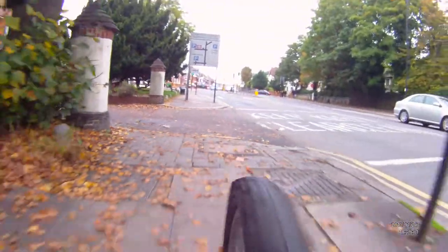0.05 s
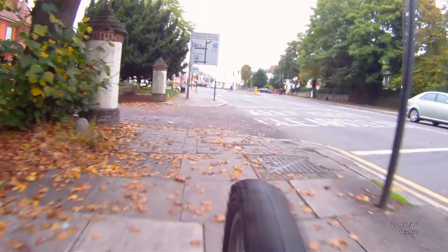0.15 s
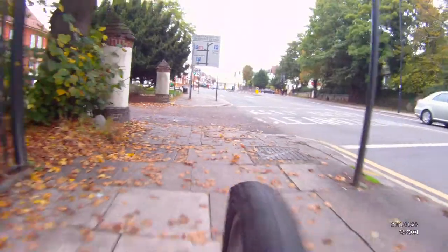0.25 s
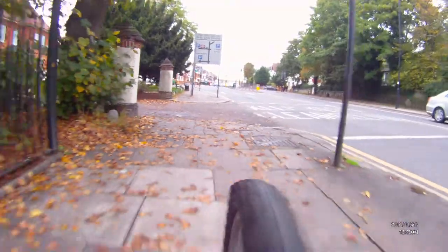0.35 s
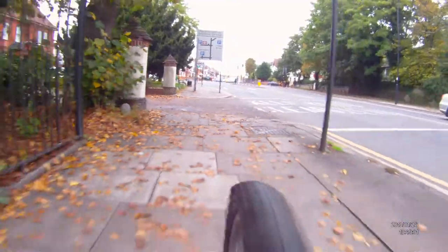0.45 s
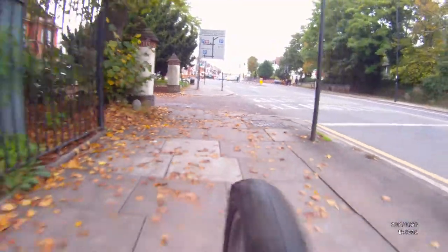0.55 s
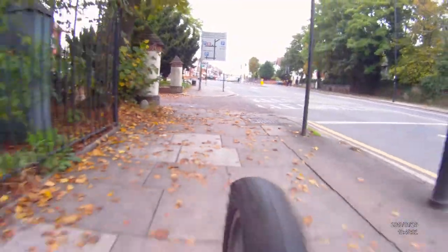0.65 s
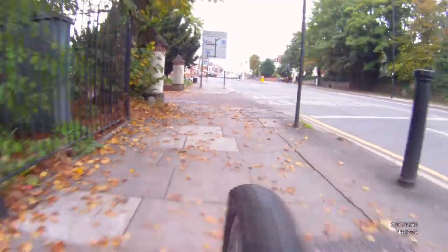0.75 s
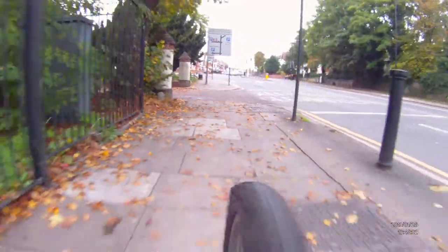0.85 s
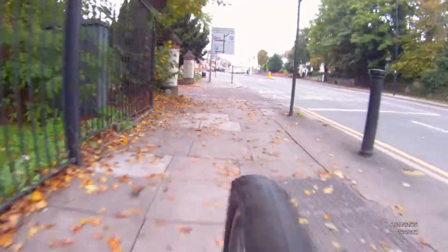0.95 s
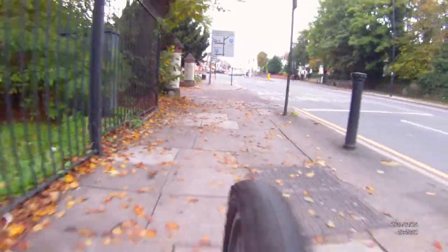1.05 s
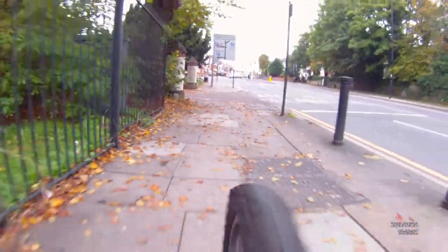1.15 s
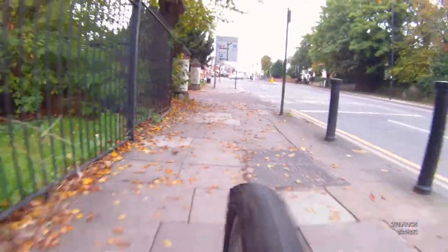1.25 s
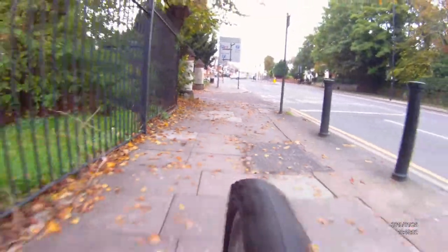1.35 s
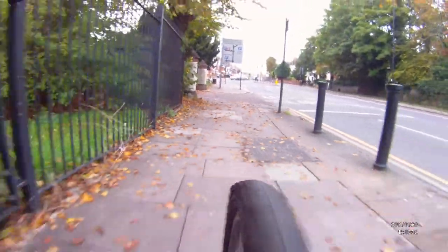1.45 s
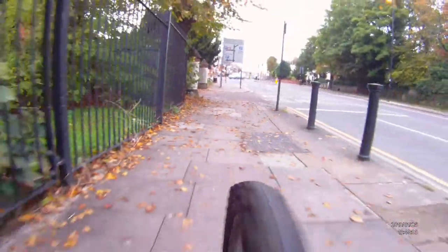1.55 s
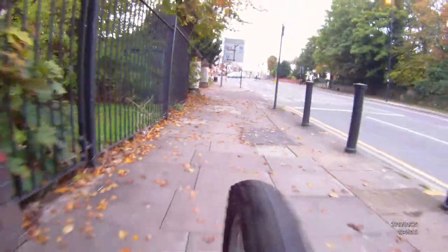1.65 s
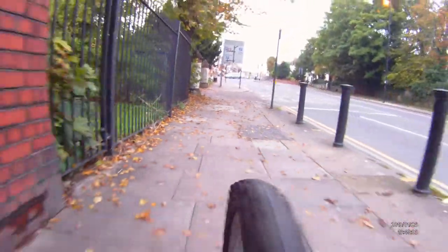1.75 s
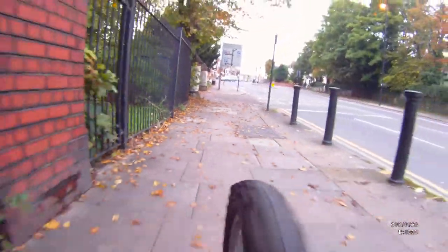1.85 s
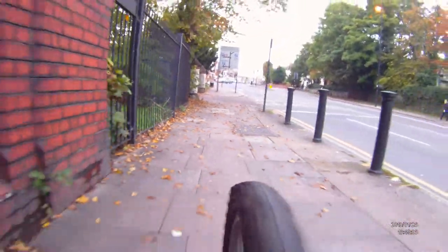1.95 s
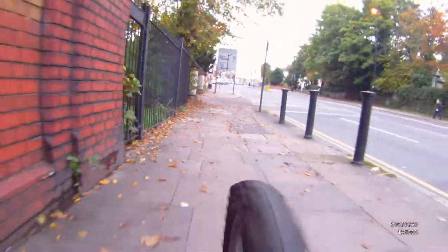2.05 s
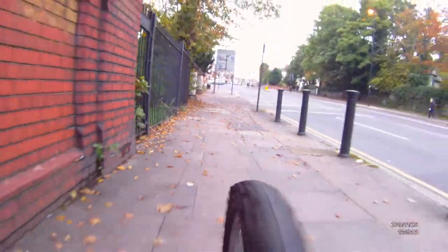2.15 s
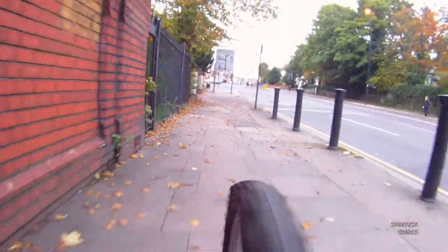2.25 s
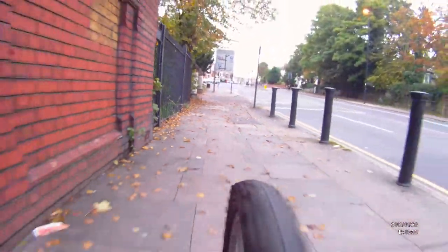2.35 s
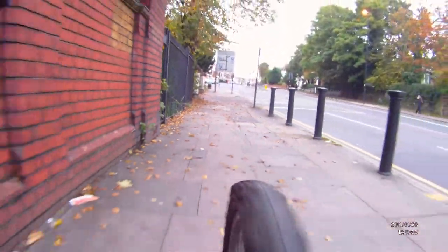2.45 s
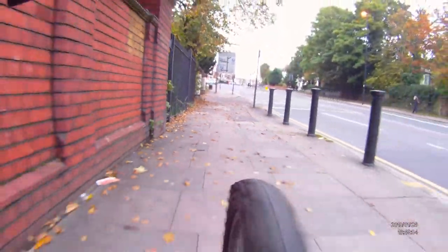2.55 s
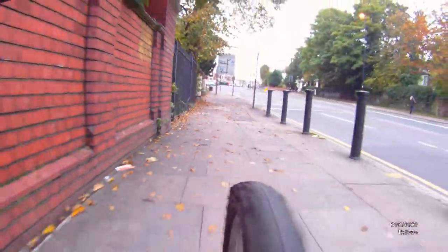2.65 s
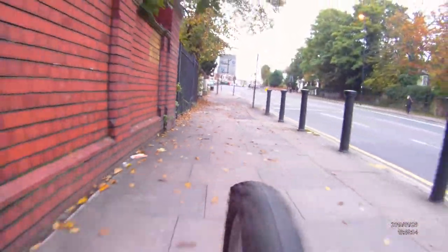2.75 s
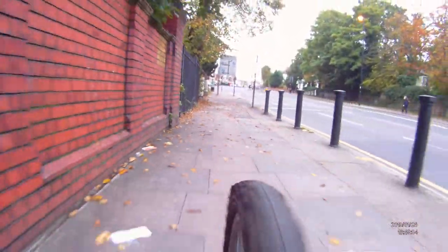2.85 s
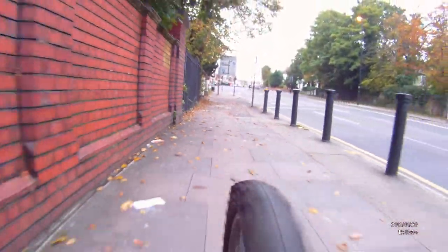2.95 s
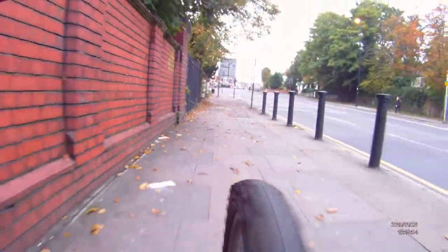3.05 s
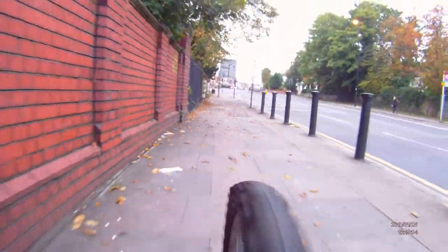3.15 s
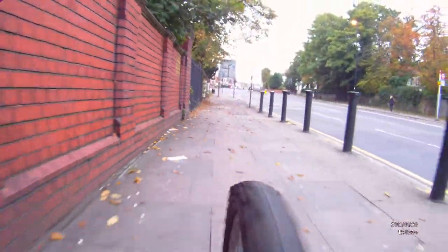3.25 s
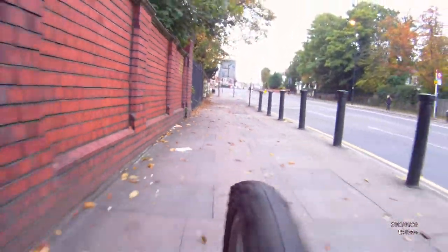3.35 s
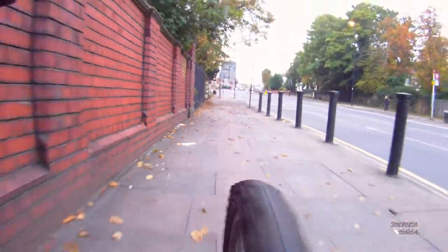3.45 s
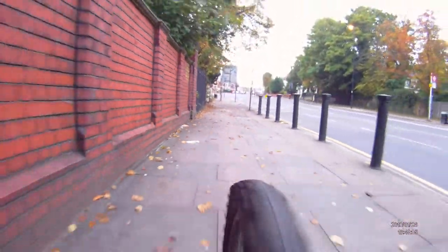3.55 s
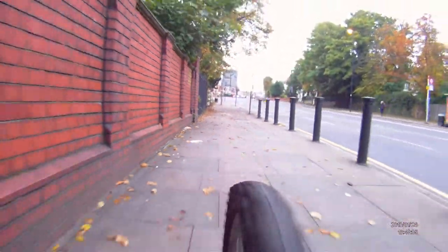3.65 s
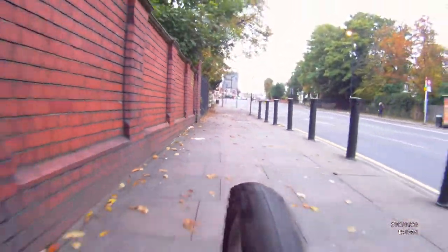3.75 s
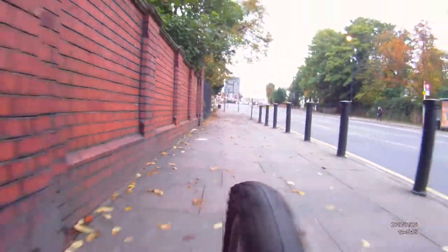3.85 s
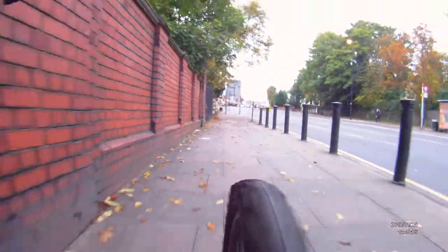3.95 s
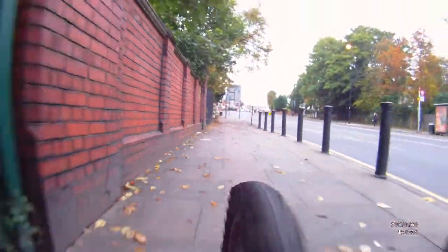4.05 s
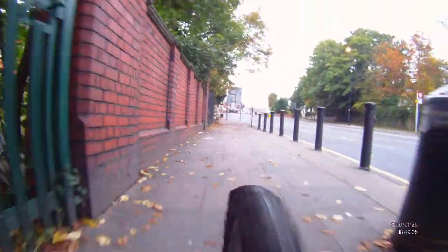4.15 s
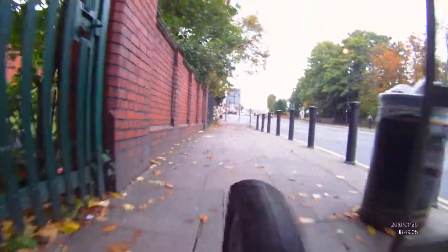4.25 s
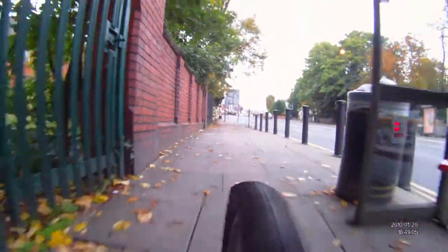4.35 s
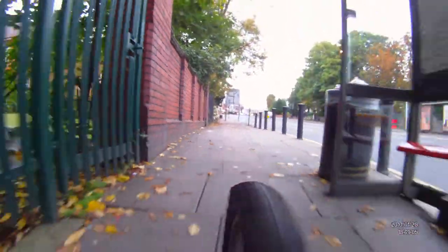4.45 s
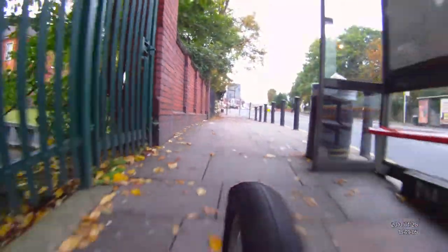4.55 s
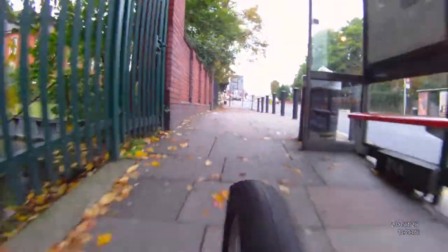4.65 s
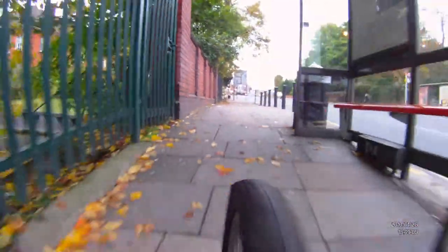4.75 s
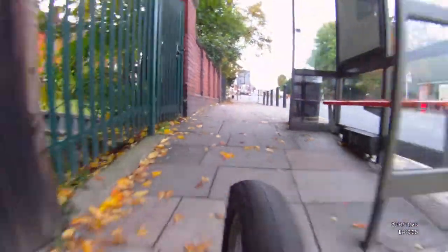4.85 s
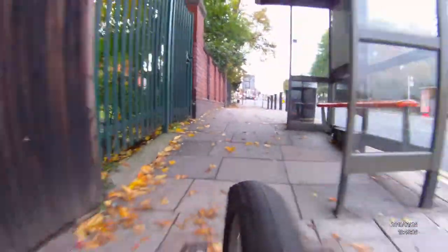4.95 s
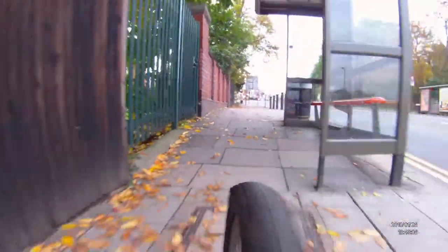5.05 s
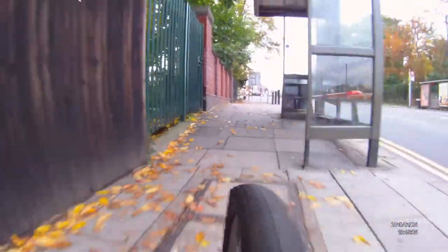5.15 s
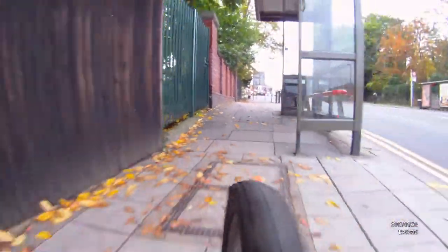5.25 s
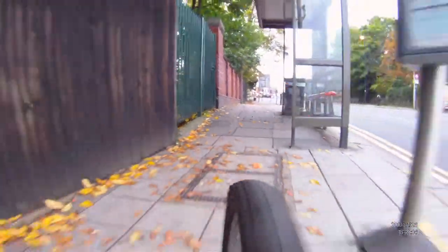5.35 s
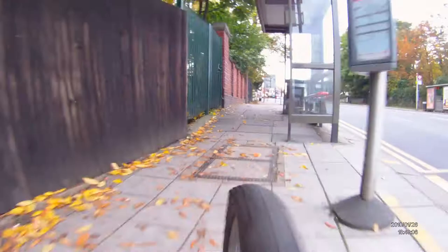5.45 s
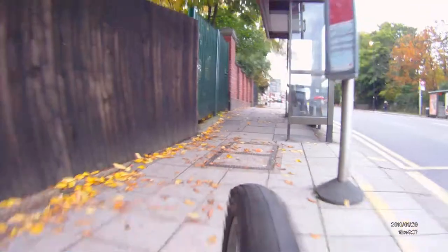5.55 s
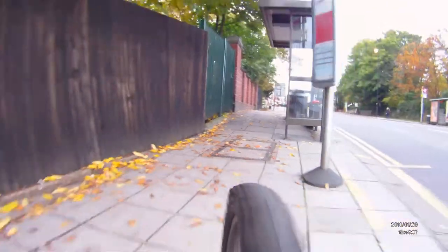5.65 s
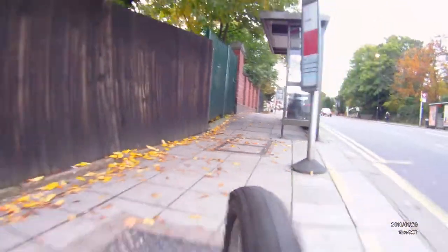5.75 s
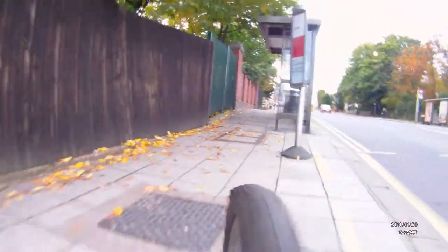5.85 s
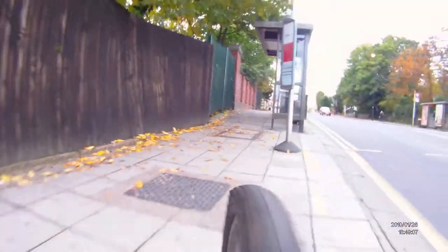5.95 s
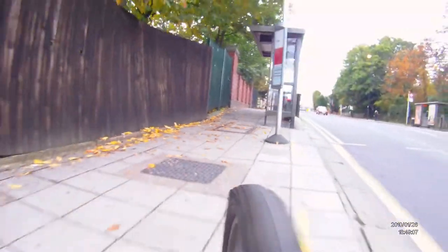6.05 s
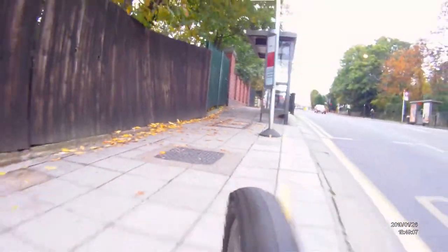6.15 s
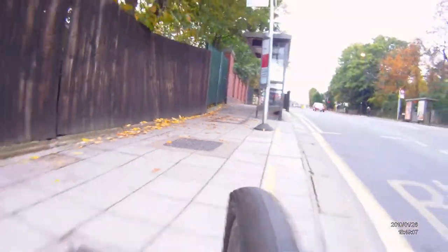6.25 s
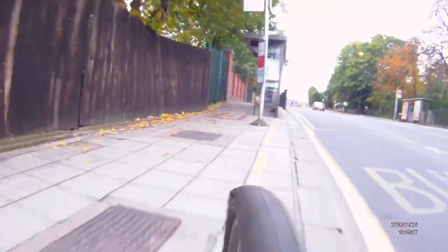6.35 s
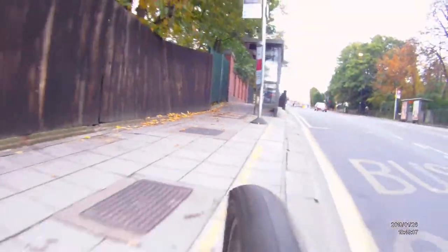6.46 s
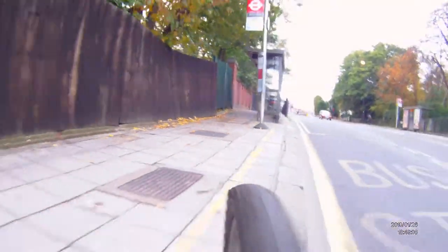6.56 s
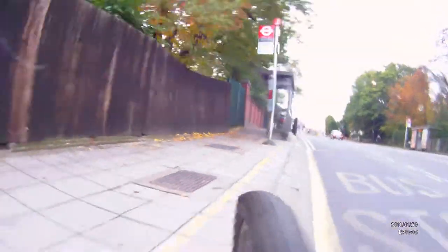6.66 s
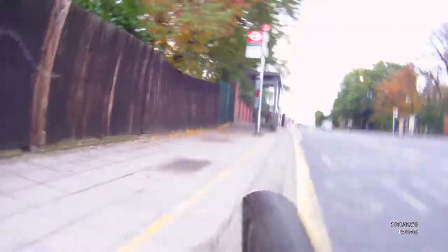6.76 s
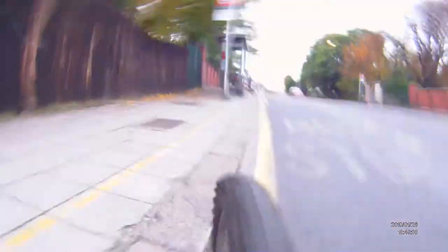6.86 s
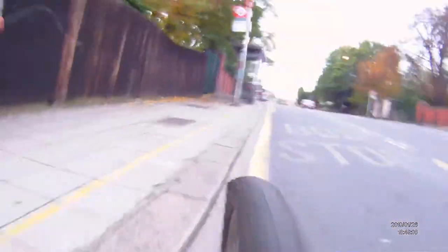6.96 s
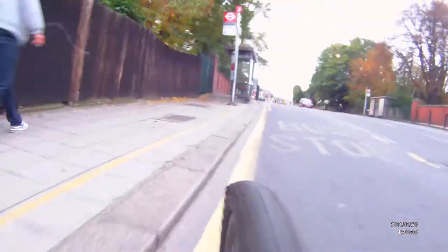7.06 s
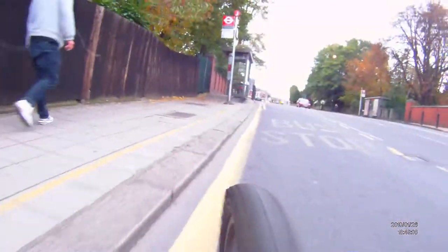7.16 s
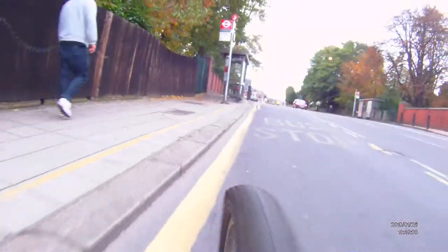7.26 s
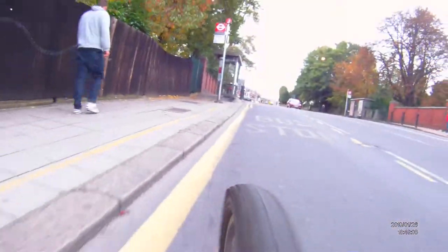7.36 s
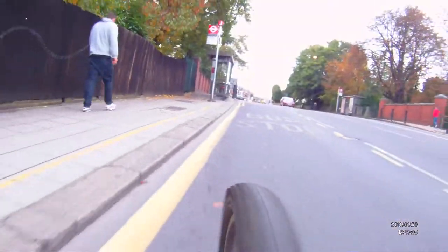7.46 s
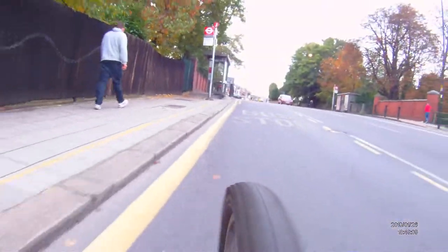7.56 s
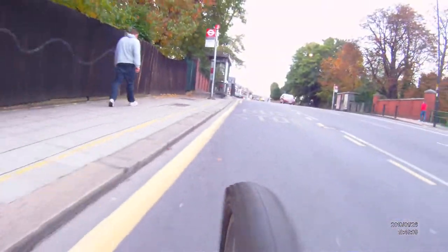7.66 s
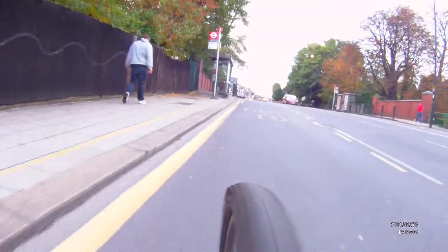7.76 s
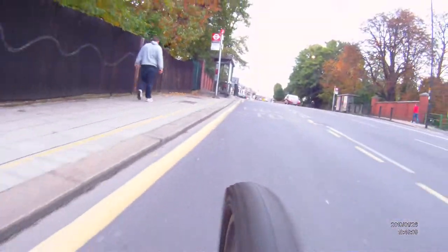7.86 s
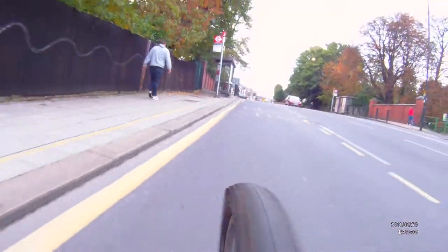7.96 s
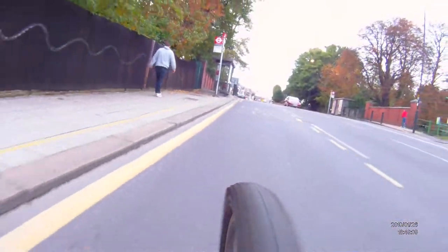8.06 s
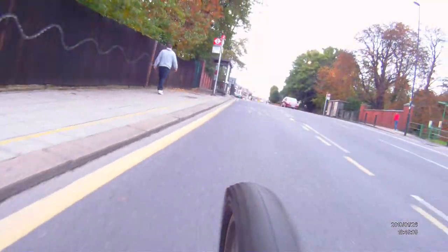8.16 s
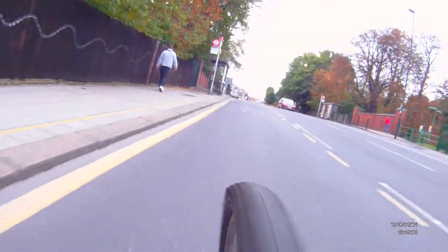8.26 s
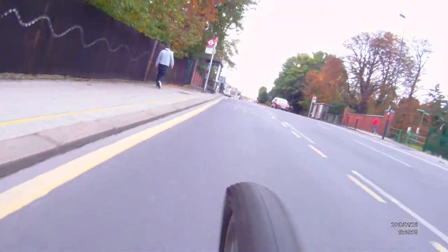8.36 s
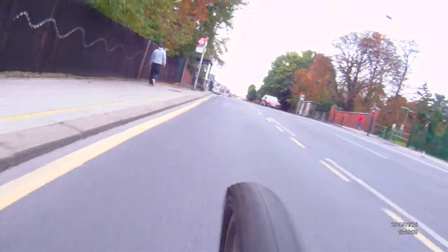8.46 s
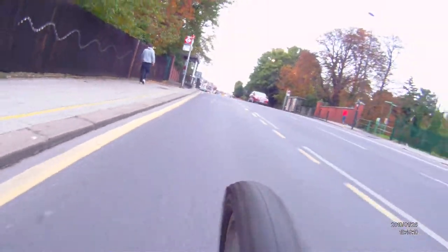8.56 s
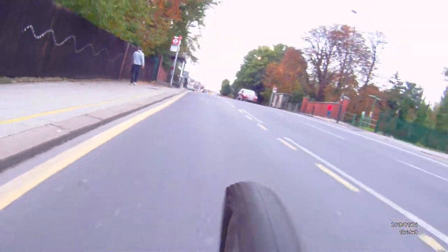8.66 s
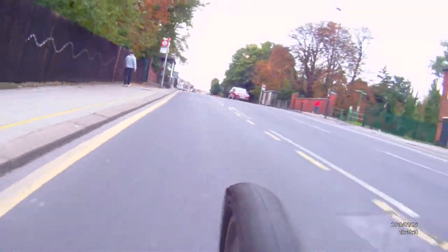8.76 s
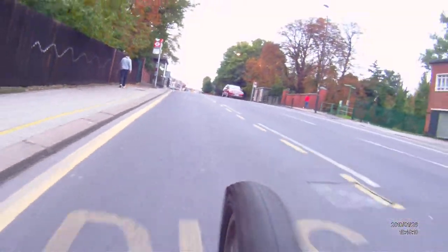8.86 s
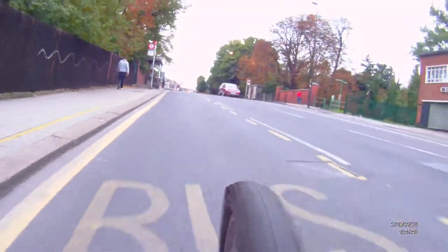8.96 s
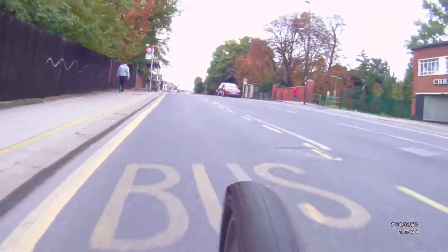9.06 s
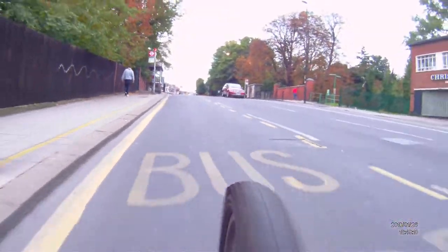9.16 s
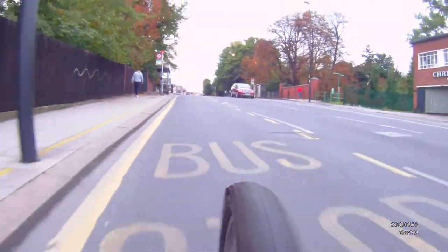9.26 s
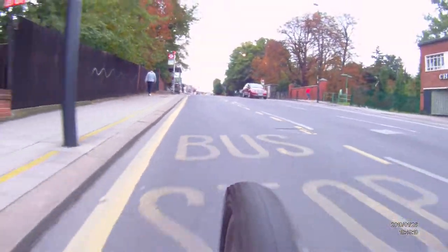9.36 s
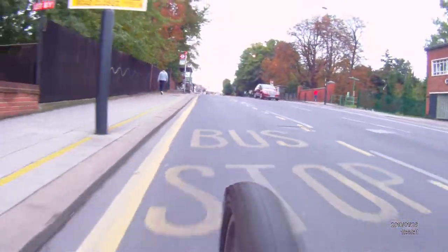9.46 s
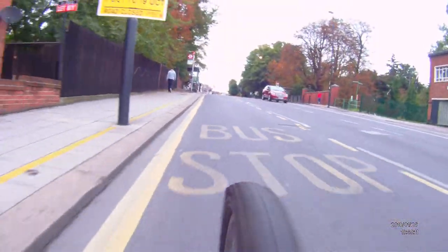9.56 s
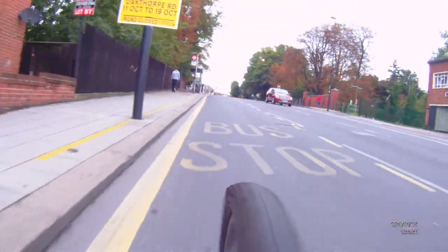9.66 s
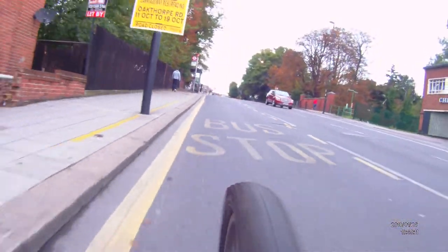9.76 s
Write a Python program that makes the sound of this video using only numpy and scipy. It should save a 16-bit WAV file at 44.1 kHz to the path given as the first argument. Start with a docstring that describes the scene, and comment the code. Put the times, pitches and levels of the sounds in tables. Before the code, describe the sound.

Close, boxy rattling and quick irregular ticks come from a bicycle riding over a pavement, with the microphone in a housing fixed to it. Brief squeaks and scattered knocks sit over a continuous tyre hum and rumble. The knocking thickens past the middle and peaks in a hard, overloaded clatter at the kerb. Then the ride turns smoother on the road, the hum slightly higher, with light rattling and several tiny pings.

```python
"""Camera housing on a moving bicycle

A closed housing rides on a bicycle frame over paving slabs, drops off a kerb and rolls on asphalt.
The tyre drones below while frame vibration drives the housing's resonances. The mount squeaks by
stick-slip friction and a loose part ticks against the wall. Slab joints and the kerb cause knocks
and thuds; short, clean pings follow on the asphalt. The hardest jolts overload the input."""
import sys
import numpy as np
from scipy import signal
from scipy.io import wavfile

SR = 44100
rng = np.random.default_rng(int(sys.argv[2]) if len(sys.argv) > 2 else 0)


def bounce(signal):
    """Save signal as a 16-bit WAV file at the path given by the first command-line argument."""
    frames = np.transpose(np.atleast_2d(signal))
    limited = np.clip(frames, -1, 1)
    pcm = np.round(limited * 32767).astype(np.int16)
    wavfile.write(sys.argv[1], SR, pcm)


N = 432621

# Tyre tones: time_s, upper_hz, upper_db, low_db, clear_share (0-1, of the upper tone's power)
TYRE_CURVE = [(0, 239.1, -30.5, -60, 0.56), (.7, 232.6, -37, -50, 0.35), (1.3, 237.3, -31, -48.5, 0.84),
              (2.4, 229.2, -31.5, -47.5, 0.94), (4.2, 225.5, -36.5, -50, 0.67),
              (4.8, 238, -30.5, -41.5, 0.18), (5.3, 240.2, -33, -46, 0.58), (6.25, 239.6, -30, -34.5, 0),
              (7.3, 252.4, -31, -40, 0.6), (7.8, 263.7, -24.5, -38, 0.84), (8.5, 268.4, -29, -43.5, 0),
              (9.81, 272, -30.5, -42.5, 0.51)]
# Spectrum of the road rumble: centre_hz, relative_density_db
RUMBLE_BANDS = [(25, -15), (60, -11), (130, -1), (190, 2), (260, 9), (310, -5.5), (450, -6.5), (800, -7)]
# Frame vibration reaching the housing: time_s, level_db
SHAKE_CURVE = [(0, -29.5), (.5, -28), (1.05, -30), (3.1, -31), (4.2, -28.5), (4.65, -26.5), (4.92, -25.5),
               (5.1, -30), (5.9, -22), (6.06, -26), (6.58, -25), (6.66, -22.5), (6.9, -16.5), (6.96, -6.5),
               (7.2, -14.5), (7.33, -24), (8.03, -25), (8.6, -24), (9.81, -25)]
# Resonances of the housing: pitch_hz, bandwidth_hz, gain_db
HOUSING_MODES = [(516, 310, -12.5), (962, 39.4, 0), (1134, 135, -5), (1396, 106, 9), (1732, 510, -1),
                 (2185, 364, -5), (2494, 205, -8.5)]
# Its faint high resonances: pitch_hz, bandwidth_hz, gain_db
BUZZ_MODES = [(3390, 170, -20), (5010, 540, -21.5), (5670, 110, -21.5)]
# Squeaks of the mount: centre_s, pitch_hz, level_db, length_s
MOUNT_SQUEAKS = [(0.265, 1850, -18, 0.018), (0.385, 1887, -23, 0.046), (0.49, 2480, -19, 0.02),
                 (0.514, 1840, -14, 0.032), (0.621, 1874, -19, 0.041), (0.73, 1707, -24.5, 0.031),
                 (0.777, 2440, -27, 0.044), (0.912, 1870, -23.5, 0.075), (1.335, 1790, -24, 0.02),
                 (1.456, 1593, -18.5, 0.016), (3.942, 1775, -19, 0.01), (4.065, 1613, -17, 0.025),
                 (4.694, 1650, -22, 0.018), (4.908, 1810, -18, 0.014), (4.933, 1470, -13.5, 0.023),
                 (4.978, 1910, -17, 0.027), (5.121, 1765, -22, 0.01), (5.298, 1760, -15, 0.011),
                 (5.479, 2530, -17.5, 0.025), (5.677, 1840, -21.5, 0.036), (6.093, 2020, -18, 0.0098),
                 (6.119, 2380, -12, 0.017), (6.157, 1812, -11, .02), (6.27, 2360, -20, 0.028),
                 (6.502, 2394, -15.5, 0.015), (6.653, 2510, -21, 0.041), (6.674, 1990, -16.5, 0.064),
                 (7.25, 1800, -17, 0.04)]
# Hollow thuds of the frame: start_s, peak_db, pitch_hz
FRAME_THUDS = [(4.924, -7, 406), (6.302, -11, 400), (6.73, 0, 333)]
# Pings near the housing's main resonance: peak_s, peak_db, pitch_hz
HOUSING_PINGS = [(7.2987, -2, 1560), (7.307, -6, 1500), (7.351, -10, 1572), (7.404, -8, 1486),
                 (8.45, -5, 1368), (8.5, -5, 1380), (8.6, -6.5, 1500), (8.662, 1.5, 1390),
                 (8.939, -5, 1420)]
# Loud strikes of the loose part: start_s, strength_db
LOUD_STRIKES = [(0.3685, -14.5), (0.637, -11), (0.8906, -11.5), (0.9113, -13), (1.193, -16), (1.2735, -20),
                (1.295, -16), (1.9036, -13), (2.026, -20.5), (2.142, -21.5), (2.495, -22.5), (2.9978, -22),
                (3.2365, -19), (3.297, -19), (3.4191, -22.5), (3.8488, -15.5), (3.8666, -14), (3.949, -17),
                (4.004, -20), (4.17, -15), (4.2114, -13.5), (4.272, -16), (4.492, -6.5), (4.553, -11),
                (4.6343, -16), (4.742, -12.5), (4.812, -17), (4.8529, -13.5), (4.974, -13.5), (5.057, -20),
                (5.54, -11), (5.56, -16), (5.6858, -8.5), (5.729, -0.5), (5.8296, -1), (5.894, -10.5),
                (5.9176, -7.5), (5.957, -9), (5.9986, -7), (6.2837, -13.5), (6.355, -11), (6.3759, -9),
                (6.3984, -8), (6.518, -10.5), (6.539, -8.5), (6.6482, -11.5), (6.687, -10.5), (6.83, -10),
                (6.869, -8), (7.096, -1), (7.9008, -20), (8.1, -19.5), (8.243, -23), (8.579, -16.5),
                (8.8058, -21), (8.8664, -15.5), (9.1465, -15), (9.603, -17)]
# Its light touches: time_s, strength_db
TOUCH_CURVE = [(0, -29.5), (.33, -42), (.4, -26.5), (.8, -31.5), (1.3, -28.5), (2.3, -35), (2.65, -29),
               (3.8, -27.5), (5.95, -24), (6.1, -31.5), (6.9, -19), (7.26, -38), (7.76, -32), (7.82, -27.5),
               (8.35, -27.5), (8.93, -20.5), (8.97, -34), (9.06, -39), (9.1, -25.5), (9.81, -29)]
# Resonances that it excites: pitch_hz, bandwidth_hz, gain_db
STRIKE_MODES = [(1356, 477, 5.5), (2418, 585, 6), (4586, 520, 3.5), (5750, 1260, -8), (7780, 900, -15)]
# Jolts from the road: start_s, level_db, pitch_hz, push_s
JOLTS = [(1.092, -2.5, 1560, 0.0047), (2.9114, -4, 1560, 0.0042), (4.241, -8, 1380, 0.0068),
         (4.258, -12.5, 1660, 0.0039), (4.412, -3, 1550, 0.0029), (4.56, -2.5, 2110, 0.0042),
         (5.702, -3, 1390, 0.0071), (5.756, -8.5, 1350, 0.0062), (5.797, -14, 1410, 0.0041),
         (5.845, -19, 1310, 0.0043), (5.966, -12, 970, 0.0062), (6.001, -17, 1380, 0.005),
         (6.305, -16, 1410, 0.0069), (6.714, -11, 1860, 0.0053), (6.729, -1, 1285, 0.014),
         (6.751, -1.5, 1430, 0.0031), (6.776, -4.5, 1400, 0.0037), (6.798, -14.5, 1020, 0.0028),
         (6.853, -7, 1375, 0.0022), (6.877, -9, 1400, 0.0026), (6.895, -3.5, 1460, 0.0016),
         (6.94, -2, 1413, 0.03), (6.975, -0.5, 1335, 0.019), (7.003, -2, 1485, 0.021),
         (7.03, -2, 1317, 0.045), (7.108, -2.5, 1374, 0.041), (7.176, -3, 1480, 0.012),
         (7.213, -5, 1294, 0.0063), (7.255, -6.5, 1460, 0.003), (9.07, -5, 1440, 0.0032)]
# Resonances that a jolt excites besides the housing's: pitch_hz, bandwidth_hz, gain_db
JOLT_MODES = [(944.7, 74, 4.5), (1790, 200, -10.5), (665, 480, -5.5), (2045, 330, 10)]


def amp(db):
    """Amplitude ratio of a level in decibels."""
    return 10 ** (np.asarray(db) / 20)


def unit_rms(x):
    """Normalisation to a root mean square of 1."""
    return x / np.sqrt(np.mean(x ** 2) + 1e-20)


def curves(rows):
    """Linear interpolation of each column over time, sample by sample."""
    times, *columns = np.transpose(rows)
    return [np.interp(np.arange(N) / SR, times, column) for column in columns]


def drift(rate_hz):
    """Random fluctuation: low-passed noise of rms 1."""
    pole = np.exp(-2 * np.pi * rate_hz / SR)
    return unit_rms(signal.lfilter([1], [1, -2 * pole, pole * pole], rng.standard_normal(N + SR))[SR:])


def resonate(x, hz, width_hz):
    """Response of a damped oscillator with unit gain at resonance."""
    radius = np.exp(-np.pi * width_hz / SR)
    feedback = [1, -2 * radius * np.cos(2 * np.pi * hz / SR), radius ** 2]
    return signal.lfilter(np.array([1, 0, -1]) * (1 - radius ** 2) / 2, feedback, x)


def modal_sum(x, modes):
    """Superposition of modes with alternating signs."""
    return sum((-1) ** k * amp(db) * resonate(x, hz, width) for k, (hz, width, db) in enumerate(modes))


def wall(x, cutoff_hz=3200):
    """Transmission loss: the housing wall passes little above the cutoff."""
    return signal.sosfilt(signal.butter(2, cutoff_hz, fs=SR, output="sos"), x)


def wavering_tone(hz, spread_hz, steady=0):
    """Random modulation spreads a tone into a narrow band around an optional steady carrier."""
    phase = 2 * np.pi * np.cumsum(hz) / SR
    return unit_rms((steady + drift(spread_hz)) * np.cos(phase) + drift(spread_hz) * np.sin(phase))


def electronics():
    """The electronic noise floor: broadband hiss and a thin, wavering whine."""
    whine_hz = 7850 + 25.3 * drift(50.5)
    hiss = unit_rms(resonate(rng.standard_normal(N), 8000, 14000))
    whine = amp(-58 + 0.76 * drift(40)) * np.sin(2 * np.pi * np.cumsum(whine_hz) / SR)
    return amp(-67) * hiss + whine


def road_rumble():
    """Random excitation by the road: adjoining bands of low noise."""
    hz, band_db = np.transpose(RUMBLE_BANDS)
    edges = np.r_[hz[0] * .7, np.sqrt(hz[1:] * hz[:-1]), hz[-1] * 1.4]
    rumble = np.zeros(N)
    for low_hz, high_hz, db in zip(edges, edges[1:], band_db):
        band = signal.butter(2, [low_hz, high_hz], "band", fs=SR, output="sos")
        rumble += amp(db) * signal.sosfilt(band, rng.standard_normal(N))
    return unit_rms(rumble)


def tyre_drone():
    """Rolling noise: three tones in constant ratio rise together with speed, over road rumble."""
    upper_hz, upper_db, low_db, clear = curves(TYRE_CURVE)
    line = wavering_tone(upper_hz, spread_hz=4, steady=2.5)
    skirt = wavering_tone(.93 * upper_hz, spread_hz=24.7)
    upper = np.sqrt(clear) * line + np.sqrt(1 - clear) * skirt
    middle = wavering_tone(4 / 5 * upper_hz, spread_hz=2.5)
    low = wavering_tone(2 / 5 * upper_hz, spread_hz=6, steady=1.2)
    tones = amp(upper_db) * upper + amp(upper_db - 12.5) * middle + amp(low_db) * low
    rumble_db = -36.5 + 0.6 * (upper_db + 36.5) - 3.5 * clear   # sinks when the upper tone is clear
    return tones + road_rumble() * amp(rumble_db + 2 * drift(13))


def housing_vibration(shake_db):
    """Forced vibration: lumpy road noise drives the housing's modes; the high buzz comes in patches."""
    lumps = amp(np.minimum(2.9 * drift(27) + 3.1 * drift(135), 5))
    body = wall(modal_sum(lumps * rng.standard_normal(N), HOUSING_MODES))
    patches = np.sqrt(lumps) * amp(3.3 * drift(30))
    buzz = modal_sum(patches * rng.standard_normal(N), BUZZ_MODES)
    return amp(shake_db) * unit_rms(body + buzz)


def mount_squeaks(shake_db):
    """Stick-slip friction: brief swelling tones slide a little in pitch, wrapped in scratch."""
    t, out = np.arange(N) / SR, np.zeros(N)
    slide = 1 + 0.0292 * drift(90)
    roughness = amp(np.clip(2 * drift(150), -6, 3))
    grit = rng.standard_normal(N)
    scratch = amp(-3) * unit_rms(resonate(resonate(grit, 1830, 600), 1830, 600))
    # Faint squeaks fall at random up to the kerb, weaker where the ride is smooth.
    kerb_s, faint_length_s = 6.7, 0.017
    when, pitch, softness = rng.random((70, 3)).T
    faint_s = .1 + (kerb_s - .1) * when
    rubbing_db = np.minimum(2 * shake_db[(faint_s * SR).astype(int)] + 28, -21)
    faint = zip(faint_s, 1700 + 660 * pitch, rubbing_db - 17 * softness)
    for centre_s, hz, db, length_s in MOUNT_SQUEAKS + [(*row, faint_length_s) for row in faint]:
        near = slice(round((centre_s - .09) * SR), round((centre_s + .09) * SR))
        swell = np.exp(-(2 * (t[near] - centre_s) / length_s) ** 2)
        phase = 2 * np.pi * np.cumsum(hz * slide[near]) / SR
        tone = np.sin(phase) + 0.066 * (np.sin(2 * phase) / 2 + np.sin(3 * phase))
        out[near] += amp(db) * (swell * tone + np.sqrt(swell) * scratch[near] / 2)
    return out * roughness


def frame_thuds():
    """Heavy damping: a soft blow rings a broad, low resonance of the frame."""
    out, t = np.zeros(N), np.arange(SR // 10) / SR
    for start_s, db, hz in FRAME_THUDS:
        push = rng.standard_normal(len(t)) * amp(-540 * t)
        thud = resonate(resonate(push, hz, 680), hz, 2100)
        at = round(start_s * SR)
        out[at:at + len(t)] += amp(db) * thud / np.abs(thud).max()
    return out


def housing_pings():
    """A single-mode transient: a soft bump swells one tone, which then decays exponentially."""
    rise_s, fall_s = 0.0016, 0.00094
    out, t = np.zeros(N + SR), np.arange(-400, 900) / SR
    swell = np.exp(-np.where(t < 0, (t / rise_s) ** 2, t / fall_s))
    for peak_s, db, hz in HOUSING_PINGS:
        at = round((peak_s + t[0]) * SR)
        out[at:at + len(t)] += amp(db) * swell * np.sin(2 * np.pi * hz * t)
    return out[:N]


def loose_part_impulses():
    """Rattling contact: a swinging part lands loud strikes, near-periodic light touches and strays."""
    swing_hz, jitter_s, strays_per_s = 49.26, .0012, 30
    loud_s, loud_db = np.transpose(LOUD_STRIKES)
    touch_db, = curves(TOUCH_CURVE)
    impulses, bounds = np.zeros(N), np.r_[0, loud_s, N / SR]
    touch_s = np.concatenate([np.linspace(a, b, max(round((b - a) * swing_hz), 1), endpoint=False)[1:]
                              for a, b in zip(bounds, bounds[1:])])
    timing, force = rng.standard_normal((600, 2))[:len(touch_s)].T
    at = np.clip((touch_s + jitter_s * timing) * SR, 0, N - 1).astype(int)
    impulses[at] = amp(touch_db[at] + 5.7 * np.clip(force, -3, 1.2))
    strays = rng.random(N) < strays_per_s * amp(4 * drift(8)) / SR   # the rate wanders, so they cluster
    impulses += strays * amp(touch_db - 6 + 6 * np.clip(rng.standard_normal(N), -2, 2))
    impulses[(loud_s * SR).astype(int)] = amp(loud_db)
    return impulses


def loose_part_ticks():
    """Impact excitation: each contact snaps, grates briefly and rings the housing."""
    impulses = loose_part_impulses()
    grate_s = 0.0014
    grate_envelope = signal.lfilter([0, .09], [1, -np.exp(-1 / (grate_s * SR))], impulses)
    force = impulses + grate_envelope * rng.standard_normal(N)
    # Every strike lands elsewhere, so each mode gets a strength of its own.
    ring = sum((-1) ** k * resonate(force * amp(db + drift(69)) + 1e-18, hz, width)
               for k, (hz, width, db) in enumerate(STRIKE_MODES))
    snap = resonate(impulses ** 0.85 + 1e-18, 7000, 6300)
    return amp(-6) * snap + amp(21.5) * wall(ring, cutoff_hz=11000)


def road_knocks():
    """Shock excitation: each jolt pushes briefly, favours one pitch and stirs the housing's modes."""
    attack_s, release_db_per_s, main_mode_hz = 0.00023, 1870, HOUSING_MODES[3][0]
    out, t = np.zeros(N + SR), np.arange(SR // 6) / SR
    chatter = amp(-15.5 - 400 * t)   # small parts keep moving a little longer
    for start_s, db, hz, push_s in JOLTS:
        noise = rng.standard_normal(len(t))
        envelope = (1 - np.exp(-t / attack_s)) * amp(-np.maximum(t - push_s, 0) * release_db_per_s)
        push = noise * envelope
        force = push + noise * chatter
        force[0] += 6   # the first contact is one sharp blow
        tone_gain = 12.9 / (1 + ((hz - main_mode_hz) / 135) ** 2)   # cleanest near the main resonance
        tone = tone_gain * resonate(force, hz, 75)
        ring = wall(tone + modal_sum(force, JOLT_MODES) + 2.4 * modal_sum(force, HOUSING_MODES[1:]))
        push_samples = round(max(push_s, .003) * SR) + 60
        ring /= np.sqrt(np.mean(ring[:push_samples] ** 2))
        crash = (resonate(push, 5500, 8000) + 9 * resonate(push, 2870, 1730)
                 + 2.7 * resonate(push, 4870, 360))
        at = round(start_s * SR)
        out[at:at + len(t)] += amp(db) * (ring + amp(-17.5 + 2.3 * db) * crash)   # harder is brighter
    return out[:N]


def scene():
    """Superposition: all sources add at one microphone inside the housing."""
    shake_db, = curves(SHAKE_CURVE)
    transients = (road_knocks() + housing_pings() + mount_squeaks(shake_db)
                  + frame_thuds() + loose_part_ticks())
    background = housing_vibration(shake_db) + tyre_drone() + electronics()
    return (background + transients)[None]


def record(dry):
    """Saturation: the input limits hard near full scale, then a steep low-pass cuts the top."""
    ceiling, cutoff_hz = .96, 15500
    lowpass = signal.ellip(10, .1, 80, cutoff_hz, fs=SR, output="sos")
    return signal.sosfilt(lowpass, np.clip(dry, -ceiling, ceiling))


dry = scene()
out = record(dry)
bounce(out)
```